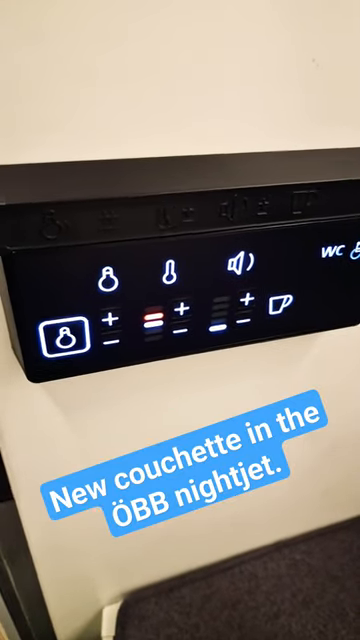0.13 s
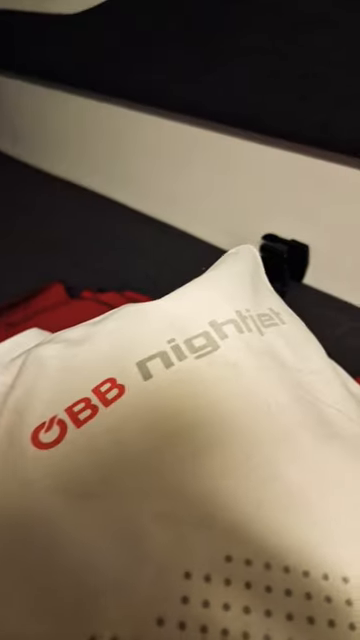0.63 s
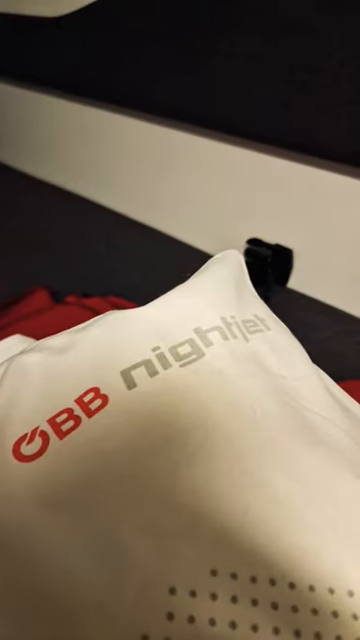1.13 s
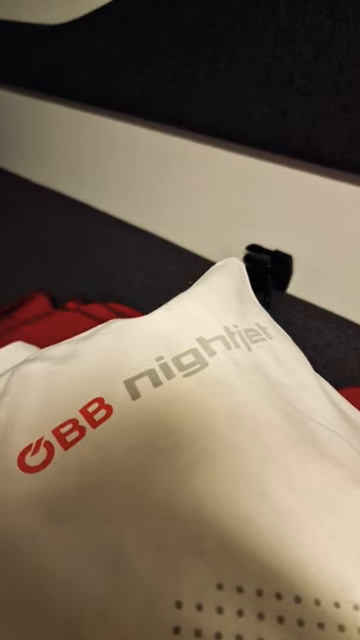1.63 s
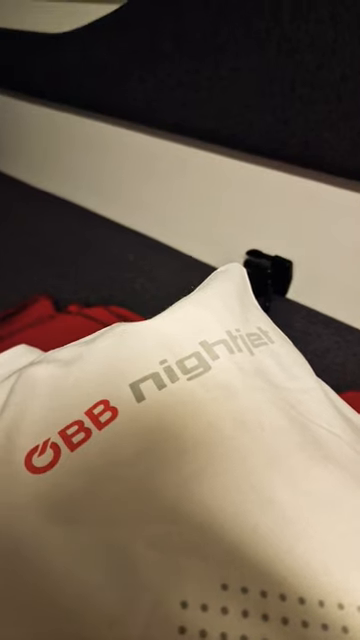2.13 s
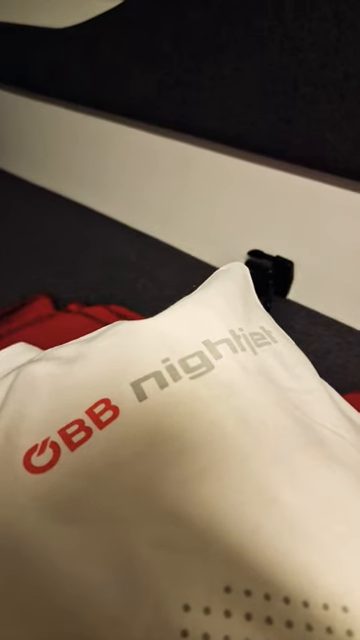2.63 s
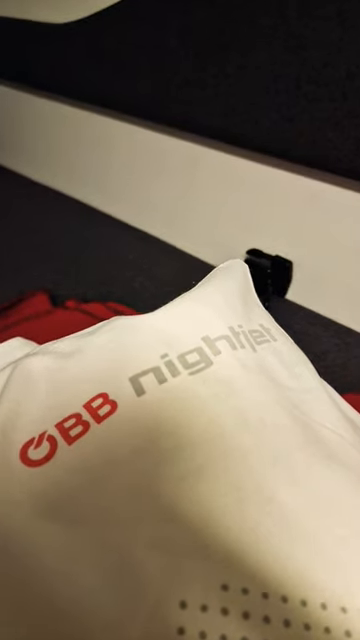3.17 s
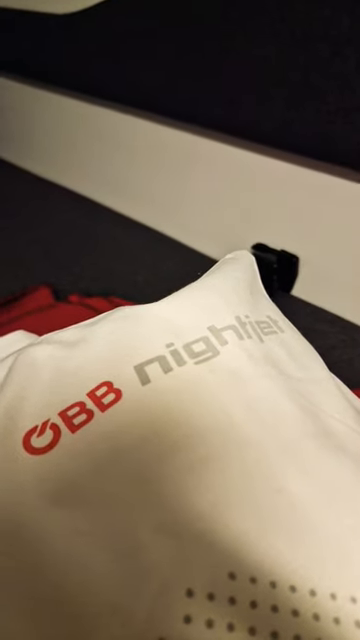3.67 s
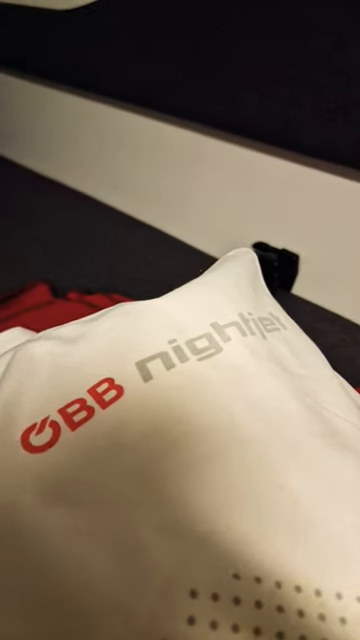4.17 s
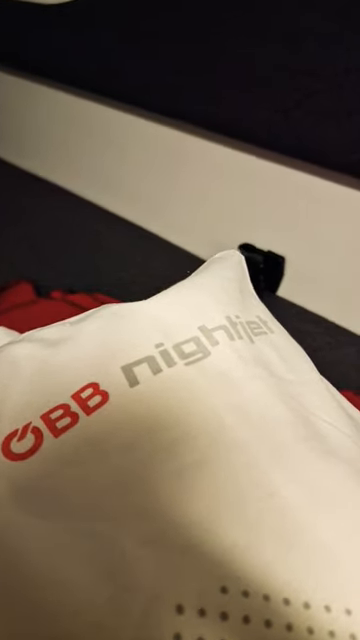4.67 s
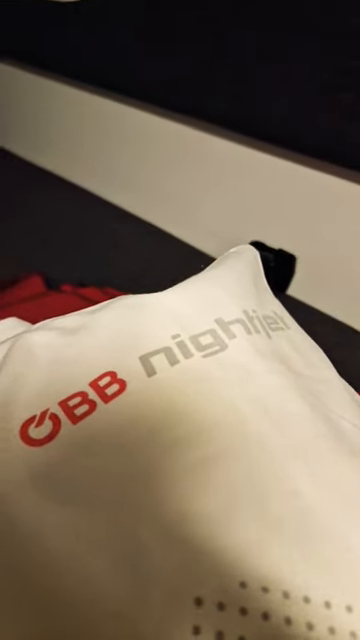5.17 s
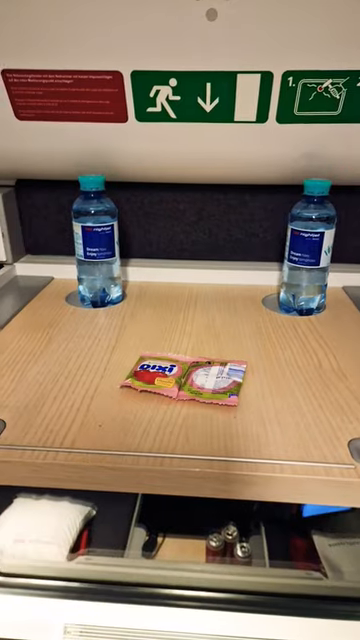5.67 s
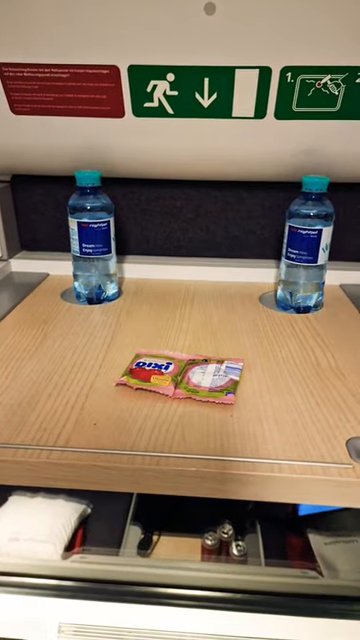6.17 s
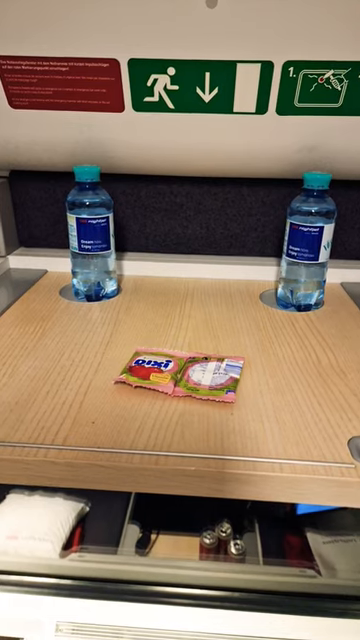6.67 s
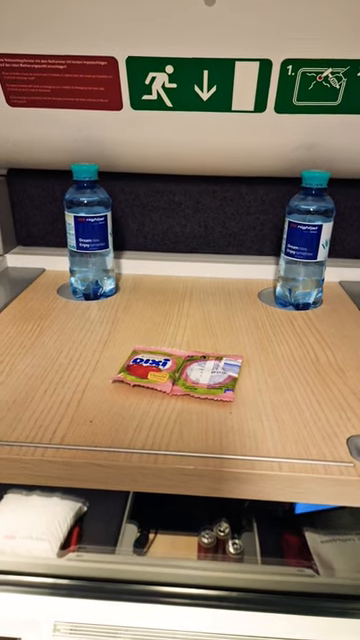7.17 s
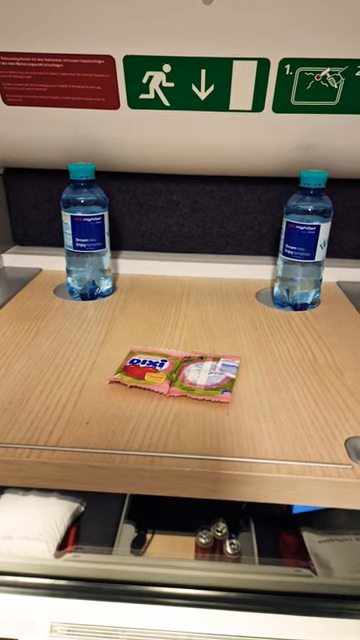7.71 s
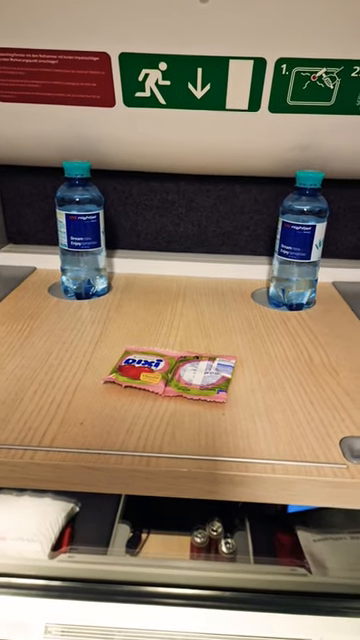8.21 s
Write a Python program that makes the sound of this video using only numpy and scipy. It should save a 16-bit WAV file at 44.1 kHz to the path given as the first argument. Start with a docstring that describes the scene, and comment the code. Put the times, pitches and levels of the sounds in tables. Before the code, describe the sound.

Low rumble and hum inside a moving night train compartment, cut twice by tiny silent gaps and clicks, with soft airy ventilation on top.

```python
"""Sleeper compartment on rails

Three moments inside a moving train, joined by hard cuts with a short silence. Coloured noise makes the
rumble of the bogies through the floor, the drone of the body shell, the rush of the vents and a faint hiss.
Wandering narrow bands make booming panels, a motor hum and whistles that come and go in the rush. Single
tones swell briefly in rumble and drone; sines are mains hum and a thin whine; short bursts tick as loose trim."""
import sys
import numpy as np
from scipy import signal
from scipy.fft import rfft, irfft, next_fast_len
from scipy.io import wavfile

SR = 44100
rng = np.random.default_rng(int(sys.argv[2]) if len(sys.argv) > 2 else 0)


def decibels_to_gain(level_db):
    """Convert a level in decibels to a linear amplitude gain (20 dB per decade)."""
    exponent = np.asarray(level_db, float) / 20
    return 10 ** exponent


def digitize_waveform(pressure):
    """Quantize a signal to 16-bit integers and store it at the path in sys.argv[1].

    Rows of a 2-D input are taken as channels; values are limited to [-1, 1].
    """
    field = np.atleast_2d(pressure).T
    bounded = np.clip(field, -1, 1)
    quanta = np.round(bounded * 32767).astype(np.int16)
    wavfile.write(sys.argv[1], SR, quanta)


N = 366912

# the moments: start t/s, end t/s, left and right sample value that the cut-in jumps to
MOMENTS = [(0, .494, -.02, -.016), (.5173, 5.6255, .047, .025), (5.6489, 8.32, .087, .062)]
# steady levels, a row per moment: drone level/dB, air level/dB, motor hum level/dB
LEVELS = [(-36, -56.5, -45.5), (-44, -58.5, -42.5), (-41, -55.5, -50.5)]
# steady rumble: level/dB, one per moment
RUMBLE_DB = (-36, -35.5, -33.5)
# relative spectra of rumble, drone and air rush, one per moment: f/Hz, level/dB per Hz
RUMBLE_COLOURS = [
    [(12, -44), (20, -18), (32, 5), (70, 4), (89, -9), (130, -17), (170, -42), (290, -120)],
    [(12, -32), (20, -15.5), (32, -3.5), (53, -3.5), (63, -3.5), (81, -12.5), (108, -17), (124, -14),
     (130, -26), (170, -49.5), (290, -120)],
    [(12, -37), (20, -18), (42, 6.5), (59, 1.5), (73, -1), (113, -9.5), (130, -28), (170, -43), (290, -120)],
]
DRONE_COLOURS = [
    [(76, -6), (130, -5), (254, -19), (287, -10), (491, -17.5), (534, -22.5), (614, -18.5), (713, -26.5),
     (1200, -30), (1560, -35.5), (2640, -120)],
    [(76, -56.5), (130, -8), (252, -11.5), (269, -10), (287, -6), (314, -11.5), (348, -8), (382, -15),
     (581, -17.5), (626, -20.5), (700, -20), (1200, -27.5), (1560, -63), (2640, -120)],
    [(76, -57), (130, -10.5), (215, -4), (259, -13), (295, -9), (326, -16.5), (348, -16.5), (372, -11),
     (501, -14.5), (586, -19.5), (775, -20), (1200, -26), (1560, -46.5), (2640, -120)],
]
AIR_COLOURS = [
    [(710, -42), (1200, -7), (2010, -6.5), (2180, -12), (2420, -11), (2870, -19), (4460, -19.5),
     (6080, -33), (7000, -35), (9100, -52), (15400, -120)],
    [(710, -14.5), (1200, -14.5), (1450, -14), (1840, -13), (2010, -15.5), (2330, -16), (3000, -25.5),
     (4700, -28), (5570, -36.5), (7000, -42), (9100, -70), (15400, -120)],
    [(710, -13), (1200, -9), (1420, -7.5), (1740, -4.5), (1970, -8), (2120, -10.5), (2300, -8.5),
     (2590, -15), (3970, -19), (7000, -36), (9100, -49), (15400, -120)],
]
# growth of drone and air rush through each moment: slope/(dB/s)
DRONE_RISE_DB_PER_S = [-1.5, 0.26, -0.24]
AIR_RISE_DB_PER_S = [-4, 0.18, 0.1]
# roughness of the track, as the swing of the rumble round its steady level: t/s, level/dB
TRACK = [(0, -10), (.15, -2), (.56, 3), (.73, -2.5), (1.0, 1.5), (1.22, -2), (1.45, 2.5), (1.8, 1.5),
         (2.2, 0), (2.9, 1), (3.4, -0.5), (3.62, 0), (4.0, 2), (4.45, -0.5), (4.9, 1), (5.6, 0.5),
         (6.1, 4.5), (6.65, 0), (7.1, 2), (7.7, -2), (7.95, 3.5), (8.32, -6)]
# brief gusts in the air rush: centre t/s, level/dB, length t/s
GUSTS = [(0.355, 1.5, 0.29), (0.66, 1.5, 0.19), (1.44, 1, .2), (1.7, 1, .12), (2.17, 2, 0.25), (4.0, 1, .4),
         (4.62, 2.5, 0.2), (5.39, 1.5, .12), (5.93, 3, 0.25), (6.3, 1, .15)]
# stereo lean, left minus right, one list per moment: f/Hz, level/dB
LEAN = [
    [(60, -2.5), (110, 4), (200, -1.5), (380, 0), (700, -1.5), (1290, -3.5), (2380, -0.5), (4400, -6),
     (8120, -5), (15000, -9)],
    [(60, 3), (110, 3.5), (200, -2), (380, 2), (700, -1.5), (1290, -3), (2380, -2.5), (4400, -6.5),
     (8120, -1), (15000, 2.5)],
    [(60, 3.5), (110, 5), (200, -1), (380, 0.5), (700, 1.5), (1290, -4), (2380, -1.5), (4400, -4),
     (8120, -4), (15000, -4)],
]
# power that both sides hear alike: f/Hz, share (0-1)
SHARED = [(40, 0.93), (90, 1), (180, 0.81), (330, 0.96), (500, 0.74), (800, 0.29), (1400, 0.41),
          (3000, 0.02), (8000, 0)]
# brief swells of single low tones in the rumble: centre t/s, f/Hz, level at the crest/dB, length t/s
RUMBLE_SWELLS = [(0.054, 109.5, -33, 0.08), (0.114, 115, -35, .09), (0.073, 47.2, -32, 0.24),
                 (0.171, 67.2, -30, 0.19), (0.19, 128, -34.5, 0.12), (0.222, 79.3, -35, 0.09),
                 (0.349, 133.7, -36, 0.2), (0.368, 70, -29, 0.09), (0.421, 87.8, -28, 0.14),
                 (0.546, 45.3, -27.5, 0.139), (0.848, 98.6, -33.5, 0.25), (0.852, 44.6, -30.5, 0.13),
                 (1.028, 49.8, -28.5, 0.15), (1.435, 44.6, -33, 0.19), (1.657, 48.4, -36.5, 0.21),
                 (1.922, 47.2, -31, 0.2), (2.119, 49, -29.5, 0.14), (2.229, 44.5, -30, 0.14),
                 (2.274, 65.4, -35.5, 0.14), (2.368, 40.4, -31, 0.23), (2.561, 53.3, -31, 0.14),
                 (2.703, 44.2, -29.5, 0.14), (2.851, 48.1, -26.5, 0.14), (2.946, 41.7, -30.5, 0.35),
                 (3.198, 44.4, -29.5, 0.17), (3.348, 48.4, -30, 0.15), (3.492, 48.2, -31, 0.16),
                 (3.983, 44.9, -36.5, 0.31), (4.252, 48, -31.5, 0.14), (4.587, 44, -35, 0.14),
                 (4.73, 49.8, -34.0, 0.16), (4.919, 61.6, -30.5, 0.14), (5.053, 58.8, -40, 0.36),
                 (5.181, 57.6, -37.5, 0.38), (5.357, 63.6, -33, 0.28), (5.577, 44, -36, 0.18),
                 (5.582, 63, -32.5, 0.15), (5.793, 54.4, -31, 0.15), (5.904, 59.46, -31.5, 0.45),
                 (5.97, 110.6, -39.5, 0.15), (6.067, 55.4, -27.5, 0.14), (6.391, 50.3, -22.5, 0.14),
                 (6.756, 49, -32, 0.25), (6.904, 53.8, -33, 0.14), (7.064, 60.93, -33.5, 0.43),
                 (7.266, 61.8, -25, 0.29), (7.516, 49.3, -32, 0.22), (7.965, 63.8, -29, 0.18),
                 (8.071, 55.7, -28.5, 0.14), (8.214, 57, -29.9, 0.25)]
# brief swells of single tones in the drone: centre t/s, f/Hz, level at the crest/dB, length t/s
DRONE_SWELLS = [(.075, 224.7, -41.5, .1), (0.101, 609, -46.5, .1), (.295, 500, -48, .1),
                (0.304, 632, -49, .08), (.43, 615, -50, .1), (1.504, 349, -48, .2), (5.9, 394, -48, 0.19),
                (6.602, 400, -47.5, .25), (7.132, 386, -45, 0.15), (7.15, 490, -52, .2),
                (8.08, 430, -52, .2), (5.76, 213, -45, 0.18), (6.269, 224.6, -43, .2),
                (6.622, 207.8, -45, 0.15), (6.8, 214, -40, 0.15), (6.99, 215.7, -38.5, .16),
                (7.201, 215.4, -41.5, 0.19), (7.679, 213.4, -41, .16), (7.87, 223.9, -41, 0.17),
                (8.151, 215, -40, 0.13), (8.291, 218, -38.5, .16)]
# booming panels of the body shell: f/Hz, rate of the wander that widens the band/Hz
PANELS = [(61.97, 4.3), (82.3, 8.0), (116.1, 8.0), (140.2, 9.5), (166.6, 6.7), (218, 17.4), (238, 11),
          (302.3, 6.6), (346.8, 10), (361.7, 6.0), (387.3, 8.0), (433, 5.5), (499, 5.0), (551, 5.6),
          (580, 6.0), (707, 12.0), (657, 12.0), (766, 16), (805, 4.0)]
# steady panel booms, a row per moment: level/dB of each panel
PANEL_LEVELS = [(-42.5, -40, -45, -50.5, -70, -47, -57, -61, -61, -53, -57, -63, -62, -71, -71, -72, -62, -76, -67),
                (-44.5, -48.5, -52, -53, -66.5, -53.5, -61, -57.5, -54, -62.5, -59.5, -60.5, -63.5, -78, -61.5, -63, -69, -77.5, -69.5),
                (-39, -43.5, -48.5, -55, -52, -50.5, -54.5, -54.5, -72, -54, -57, -56.5, -55, -64, -75.5, -73, -60.5, -58, -74)]
# part of a panel's boom that differs between the sides: f/Hz, gain against the shared part
PANEL_OWN = [(60, 0.34), (250, 0.44), (600, .9)]
# whistles of the second and third moment: start t/s, end t/s, start f/Hz, end f/Hz, level/dB
WHISTLES = [
    [(.3, 2.3, 1915, 1890, -77), (2.3, 2.68, 2345, 2345, -66), (2.74, 2.96, 2350, 2350, -64),
     (2.95, 3.17, 2345, 2345, -63), (3.5, 4.0, 2340, 2335, -68), (2.35, 2.9, 1780, 1775, -71),
     (3.5, 4.5, 1778, 1730, -67.5), (4.25, 5.9, 1738, 1725, -66), (3.3, 4.8, 1900, 1890, -72)],
    [(5.4, 6.6, 1690, 1690, -64), (5.4, 6.6, 1740, 1735, -66), (6.0, 6.5, 1790, 1790, -67),
     (5.4, 6.2, 1915, 1920, -65), (6.7, 7.5, 1925, 1925, -64), (5.8, 7.3, 1955, 1955, -67.5),
     (5.4, 6.15, 2340, 2340, -68), (6.6, 8.2, 1750, 1715, -66.5), (6.3, 8.6, 2350, 2325, -71),
     (7.6, 8.6, 1930, 1910, -67), (7.8, 8.6, 1660, 1650, -69)],
]
# roughness of the whistles in those two moments: rate of the wander/Hz
WHISTLE_WIDTHS_HZ = [17, 22]
# brief swells and dips of the motor hum: centre t/s, level/dB, length t/s
HUM_SWELLS = [(.21, -5, .1), (.35, 5.5, .1), (0.708, -9, 0.13), (0.9, -7, 0.099), (1.274, -7, 0.4),
              (1.5, 2, 0.14), (1.804, -2, 0.11), (1.95, 4.5, 0.28), (2.187, -9, 0.26), (3.196, 2, 0.11),
              (3.6, -5, 0.19), (3.995, 4.5, 0.14), (4.43, -6, 0.21), (4.637, 2, 0.1), (4.777, -3.5, 0.2),
              (5.05, -3, 0.13), (5.545, -4, .15), (8.123, 6, .3)]
# mains hum: level/dB, one per moment
MAINS_DB = (-47, -47, -48)
# lines of the electronic whine: multiples of its base pitch
WHINE_MULTIPLES = (2, 4, 5)
# strength of those lines, a row per line: level/dB in each moment
WHINE_LEVELS = [(-92, -86.5, -100), (-99, -99, -101), (-99, -99, -103)]
# faint ticks of loose trim: start t/s, level/dB, f/Hz
TICKS = [(1.4087, -60, 7580), (2.4694, -65, 6430), (4.3645, -70, 6700)]
# relative spectrum of the microphone hiss: f/Hz, level/dB per Hz
HISS_COLOUR = [(4120, -35), (7000, 0), (10200, -4), (11100, -7), (12000, -4), (14200, -5), (15000, -4)]

LEFT_LAG_S = 0.00032


def rms_one(x):
    """Scales to rms 1."""
    return x / np.sqrt(np.mean(x ** 2) + 1e-20)


def at_hz(points, hz):
    """Reads a table on a log-frequency axis."""
    table_hz, values = np.transpose(points)
    return np.interp(np.log(hz + 1), np.log(table_hz), values)


def by_moment(values):
    """One value for each moment, at every sample."""
    starts = [round(m[0] * SR) for m in MOMENTS]
    return np.asarray(values)[np.searchsorted(starts, np.arange(N), side="right") - 1]


def span(start, end):
    """First and last sample of a stretch of time, kept inside the piece."""
    return max(round(start * SR), 0), min(round(end * SR), N)


def bell(s, length):
    """A smooth rise and fall centred on s."""
    return np.cos(np.pi * np.clip((np.arange(N) / SR - s) / length, -.5, .5)) ** 2


def drift(rate, count):
    """Slow chance of spread 1: coarse noise through a double one-pole low-pass at rate Hz."""
    r = np.exp(-80 * np.pi * rate / SR)  # one coarse step is 40 samples
    slow = signal.lfilter([1], [1, -2 * r, r * r], rng.standard_normal(count // 40 + 2002))
    slow = slow[2000:]  # past the settling of the filter
    return np.interp(np.arange(count) / 40, np.arange(len(slow)), rms_one(slow - slow.mean()))


def diffuse(colour, lean, count, flicker_db, flicker_rate):
    """Coloured stereo noise: a shared part, late on the left, plus a part of each side; octaves flicker."""
    size = next_fast_len(count)
    hz = np.arange(size // 2 + 1) * SR / size
    common, left, right = rfft(rng.standard_normal((3, size)))
    share = np.clip(at_hz(SHARED, hz), 0, 1)
    late = np.exp(-2j * np.pi * hz * LEFT_LAG_S)
    pair = np.sqrt(share) * np.array([common * late, common])
    pair = pair + np.sqrt(1 - share) * np.array([left, right])
    pair = pair * decibels_to_gain(at_hz(colour, hz) + at_hz(lean, hz) * [[.5], [-.5]])
    octave, out = np.log2(hz + 1), 0
    together = drift(flicker_rate, count)
    for centre in range(int(np.log2(colour[0][0])), int(np.log2(colour[-1][0])) + 2):
        band = np.clip(1 - abs(octave - centre), 0, 1)  # overlapping bands add up to one
        gain = decibels_to_gain(flicker_db * (together + 0.91 * drift(flicker_rate, count)))
        out = out + gain * irfft(pair * band, size)[:, :count]
    return out / np.sqrt(np.mean(out.mean(axis=0) ** 2))  # the average of the sides gets rms 1


def narrow(hz, width, lag, own=0.22, steady=0.0):
    """A thin band round a moving pitch: a sine whose quadratures wander, late on the left by lag radians."""
    size = len(hz)
    phase = 2 * np.pi * np.cumsum(hz) / SR - np.array([[lag], [0]])

    def wander():
        """A shared drift plus a part of each side's own."""
        return drift(width, size) + own * np.array([drift(width, size), drift(width, size)])

    return rms_one((steady + wander()) * np.cos(phase) + wander() * np.sin(phase))


def hiss():
    """Steady treble noise of the microphones."""
    return decibels_to_gain(-79) * diffuse(HISS_COLOUR, LEAN[1], N, flicker_db=.1, flicker_rate=10.0)


def ticks():
    """Each tick is a sine with noise that dies away within milliseconds, alike on both sides."""
    out, t = np.zeros(N), np.arange(round(.03 * SR)) / SR
    for s, level_db, hz in TICKS:
        burst = np.sin(2 * np.pi * hz * t) + .5 * rng.standard_normal(len(t))
        out[round(s * SR):][:len(t)] += decibels_to_gain(level_db) * burst * np.exp(-t / 0.0025)
    return out


def whine():
    """Electronic whine: thin sines on multiples of one base pitch, alike on both sides, wavering a little."""
    base_hz = 2929.7
    sag_start_s, sag_db_per_s = 3.3, 3.5
    out, t = np.zeros(N), np.arange(N) / SR
    # the lowest line fades late in the second moment
    sag_db = sag_db_per_s * np.clip(t - sag_start_s, 0, None) * (t < MOMENTS[2][0])
    for multiple, levels in zip(WHINE_MULTIPLES, WHINE_LEVELS):
        level_db = by_moment(levels) + 1.2 * drift(3.0, N)
        if multiple == WHINE_MULTIPLES[0]:
            level_db = level_db - sag_db
        out += np.sqrt(2) * decibels_to_gain(level_db) * np.sin(2 * np.pi * multiple * base_hz * t)
    return out


def mains_hum():
    """A low sine at twice the supply frequency, wavering slightly, stronger on the left."""
    mains_hz = 100.3
    cycles = np.cumsum(mains_hz + 0.62 * drift(2.2, N)) / SR
    phase = 2 * np.pi * (cycles - mains_hz * np.array([[LEFT_LAG_S], [0]]))
    level_db = by_moment(MAINS_DB) + 0.98 * drift(2.5, N) + np.array([[2.5], [-2.5]])
    return np.sqrt(2) * decibels_to_gain(level_db) * np.sin(phase)


def motor_hum():
    """A tone with a rough fringe that wavers in pitch and strength, stronger on the right."""
    hum_hz, fringe_rate_hz = 286.8, 12
    level_db = by_moment([row[-1] for row in LEVELS])
    level_db = level_db + sum(db * bell(s, length) for s, db, length in HUM_SWELLS)
    # steady: the unwavering core against the fringe
    tone = narrow(hum_hz + 1.11 * drift(5.7, N), fringe_rate_hz, 0.44, steady=4)
    return decibels_to_gain(level_db + 1.3 * drift(46.0, N)) * tone * decibels_to_gain(np.array([[-1.5], [1.5]]))


def whistles():
    """Thin strands in the air rush that swell, slide slowly and fade, each only within its moment."""
    stray_hz, left_lag_rad, fade_s = 8, 0.51, 0.16
    out = np.zeros((2, N))
    for (first, last, *_), rows, width in zip(MOMENTS[1:], WHISTLES, WHISTLE_WIDTHS_HZ):
        for start, end, start_hz, end_hz, level_db in rows:
            a, b = span(max(start, first), min(end, last))
            t = np.arange(a, b) / SR
            swell = np.clip(np.minimum(t - start, end - t) / fade_s, 0, 1)
            hz = start_hz + (end_hz - start_hz) * (t - start) / (end - start)
            hz = hz + stray_hz * drift(2.53, b - a)
            out[:, a:b] += decibels_to_gain(level_db) * swell * narrow(hz, width, left_lag_rad, steady=.9)
    return out


def panels():
    """Each panel of the shell booms in a narrow band that strays a little, late on the left."""
    out = np.zeros((2, N))
    for (hz, width), levels in zip(PANELS, np.transpose(PANEL_LEVELS)):
        pitch = hz * (1 + .012 * drift(1.514, N))
        lag = 2 * np.pi * hz * LEFT_LAG_S
        out += decibels_to_gain(by_moment(levels)) * narrow(pitch, width, lag, at_hz(PANEL_OWN, hz))
    return out


def tone_swells():
    """Single, slightly unsteady tones in rumble and drone that swell and die, late on the left."""
    waver_hz = 2.88
    out = np.zeros((2, N))
    for s, hz, crest_db, length in RUMBLE_SWELLS + DRONE_SWELLS:
        a, b = span(s - length / 2, s + length / 2)
        cycles = rng.random() + np.cumsum(hz + waver_hz * drift(4.64, b - a)) / SR
        phase = 2 * np.pi * (cycles - hz * np.array([[LEFT_LAG_S], [0]]))
        level_db = crest_db + at_hz(LEAN[1], hz) * np.array([[.5], [-.5]])
        out[:, a:b] += decibels_to_gain(level_db) * bell(s, length)[a:b] * np.sqrt(2) * np.sin(phase)
    return out


def track_swing():
    """Swing of the rumble in dB at every sample, from the roughness of the track."""
    s, swing_db = np.transpose(TRACK)
    return np.interp(np.arange(N) / SR, s, swing_db)


def carriage_noise(level_db, rises, colours, flicker_db, flicker_rate):
    """Noise with its own colour in each moment, growing or sinking round the moment's middle."""
    out = np.zeros((2, N))
    for k, (start, end, *_) in enumerate(MOMENTS):
        a, b = span(start, end)
        t = (np.arange(b - a) - (b - a) / 2) / SR
        noise = diffuse(colours[k], LEAN[k], b - a, flicker_db, flicker_rate)
        out[:, a:b] = decibels_to_gain(level_db[a:b] + rises[k] * t) * noise
    return out


def air_rush():
    """Air from the vents: noise that gusts briefly and follows the track a little."""
    level_db = by_moment([row[1] for row in LEVELS]) + .05 * track_swing()
    level_db = level_db + sum(db * bell(s, length) for s, db, length in GUSTS)
    return carriage_noise(level_db, AIR_RISE_DB_PER_S, AIR_COLOURS, flicker_db=0.35, flicker_rate=8.0)


def drone():
    """The body shell: mid-low noise that flickers fast and follows the track a little."""
    level_db = by_moment([row[0] for row in LEVELS]) + 0.033 * track_swing()
    return carriage_noise(level_db, DRONE_RISE_DB_PER_S, DRONE_COLOURS, flicker_db=0.78, flicker_rate=25.0)


def rumble():
    """The bogies through the floor: deep noise that swings with the roughness of the track."""
    level_db = by_moment(RUMBLE_DB) + track_swing()
    return carriage_noise(level_db, (0, 0, 0), RUMBLE_COLOURS, flicker_db=-1.06, flicker_rate=3.3)


def scene():
    """All sources of the compartment."""
    faint = hiss() + ticks() + whine()
    tonal = mains_hum() + motor_hum() + whistles()
    return faint + tonal + panels() + tone_swells() + air_rush() + drone() + rumble()


def roll_off(x):
    """The treble ends steeply here."""
    return signal.sosfilt(signal.butter(12, 16500, fs=SR, output="sos"), x)


def record(dry):
    """Trims both ends of the spectrum; each moment clicks in mid-swing and fades fast into silence."""
    low_cut_hz, top_cut_hz, click_top_hz = 24, 15750, 16900
    fade_s, last_fade_s, swing_s = 0.018, .002, 0.0067
    run_in = 4000  # samples that settle the filters
    dry = np.pad(dry, [(0, 0), (run_in, 0)], "reflect")
    dry = signal.sosfilt(signal.butter(2, low_cut_hz, "high", fs=SR, output="sos"), dry)
    dry = signal.sosfilt(signal.cheby2(12, 50, top_cut_hz, fs=SR, output="sos"), dry)[:, run_in:]
    out = np.zeros_like(dry)
    for start, end, left, right in MOMENTS:
        a, b = span(start, end)
        t = np.arange(b - a) / SR
        jump = np.array([[left], [right]]) - dry[:, a:a + 1]
        length = fade_s if b < N else last_fade_s
        fade = np.sin(np.pi / 2 * np.clip((end - start - t) / length, 0, 1)) ** 2
        out[:, a:b] = (dry[:, a:b] + jump * np.exp(-(t / swing_s) ** 2)) * fade
    out = signal.sosfilt(signal.cheby2(12, 50, click_top_hz, fs=SR, output="sos"), out)  # rounds the clicks
    return roll_off(out)


dry = scene()
out = record(dry)
digitize_waveform(out)
```